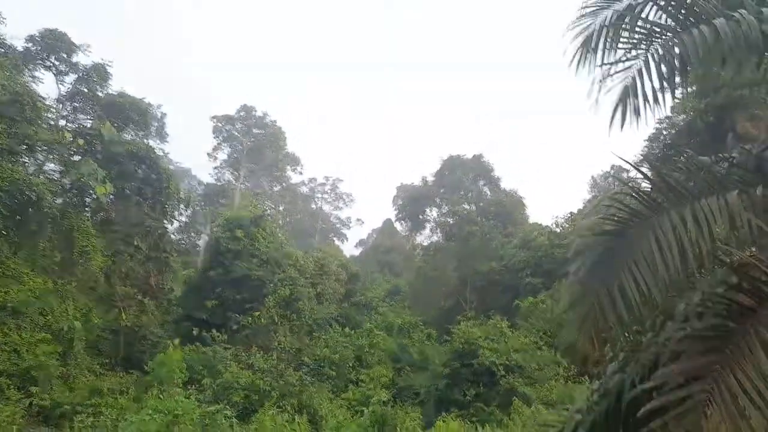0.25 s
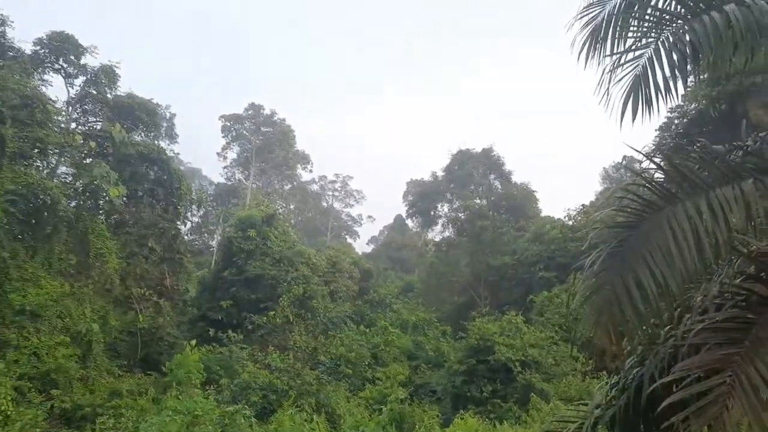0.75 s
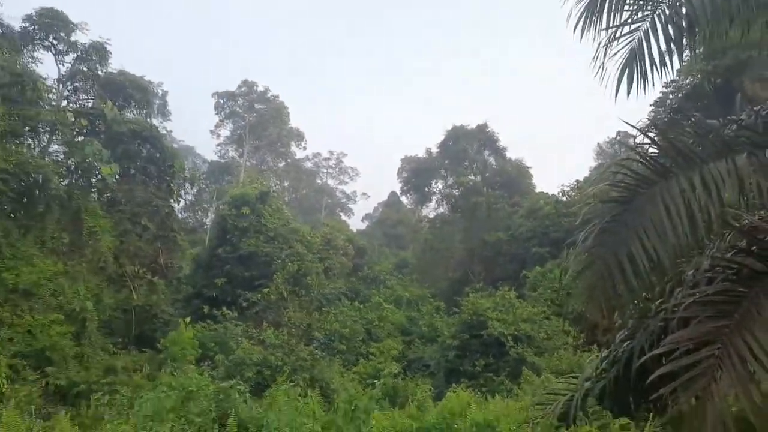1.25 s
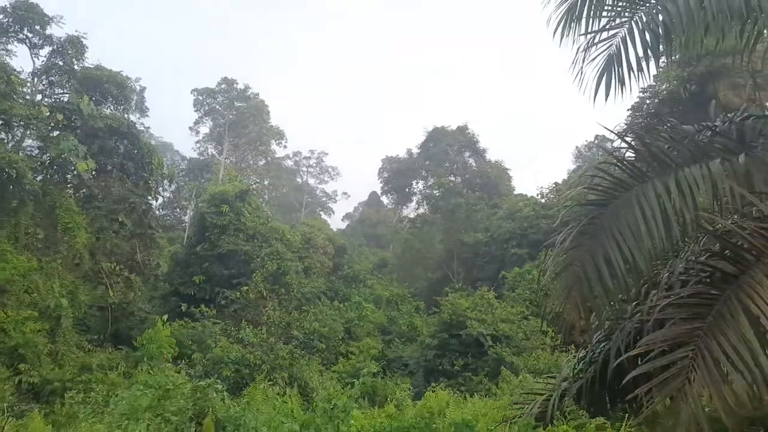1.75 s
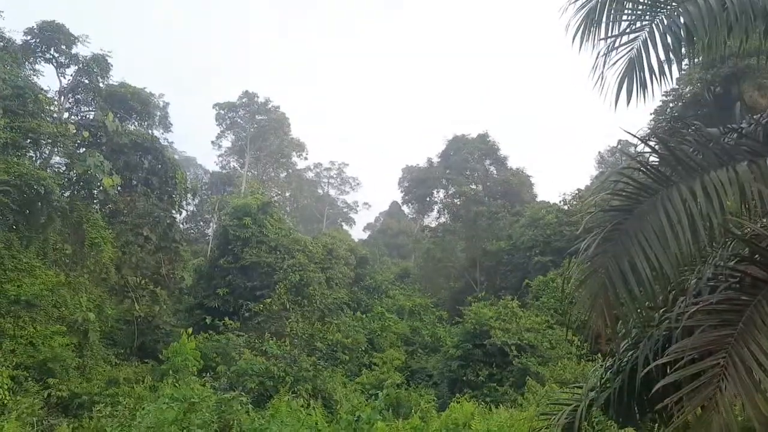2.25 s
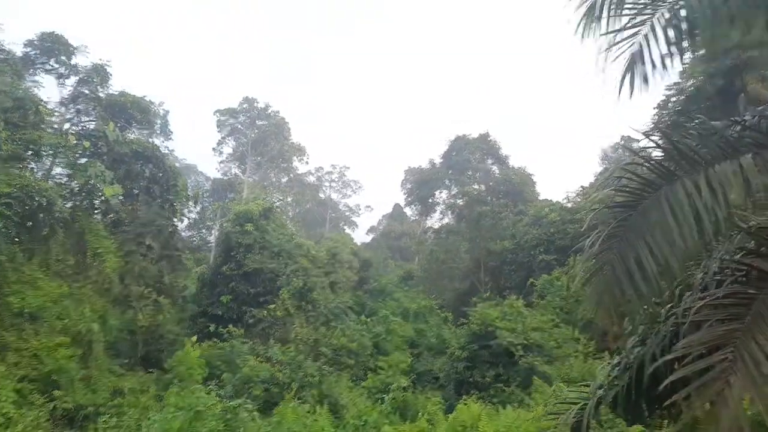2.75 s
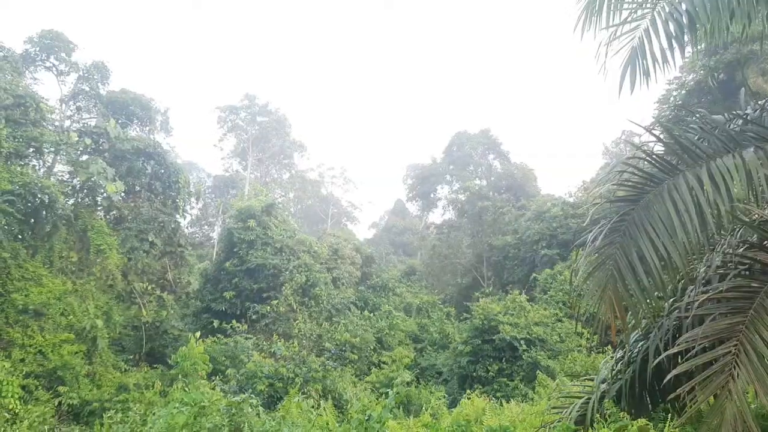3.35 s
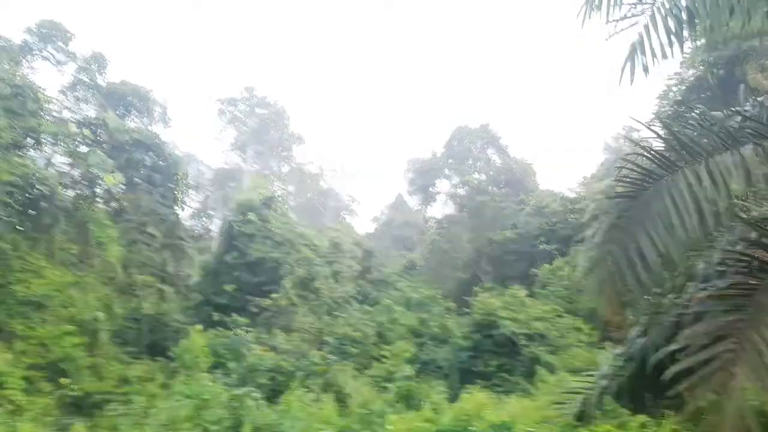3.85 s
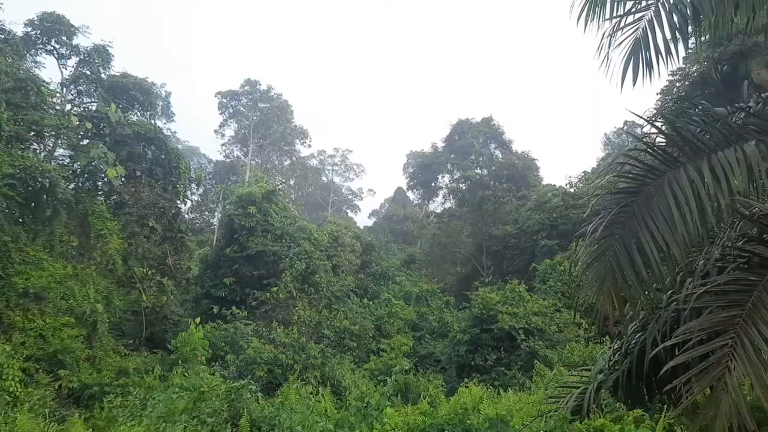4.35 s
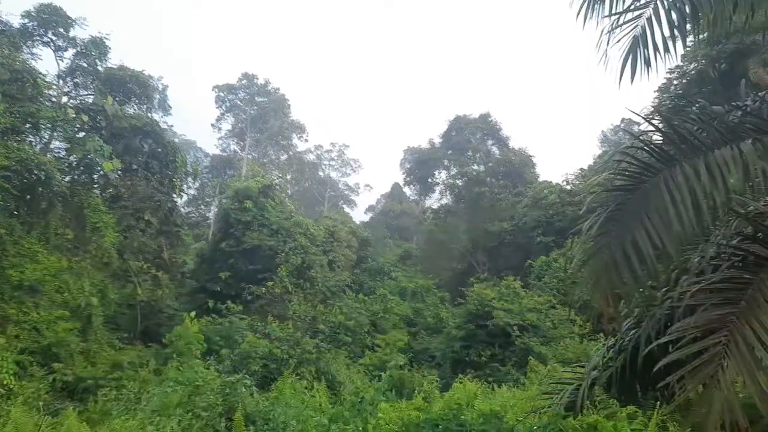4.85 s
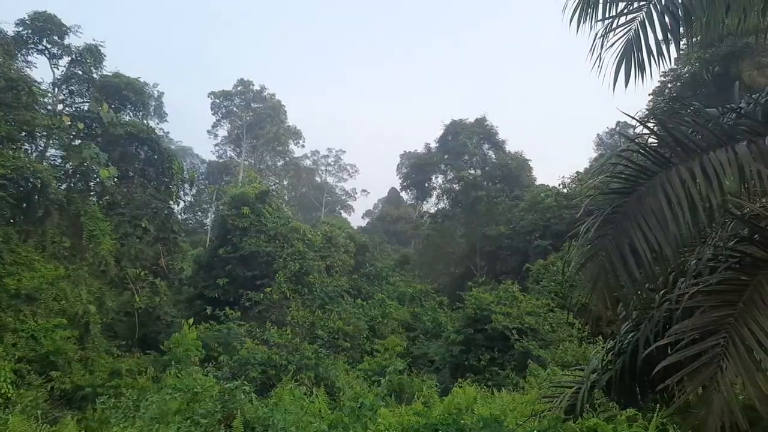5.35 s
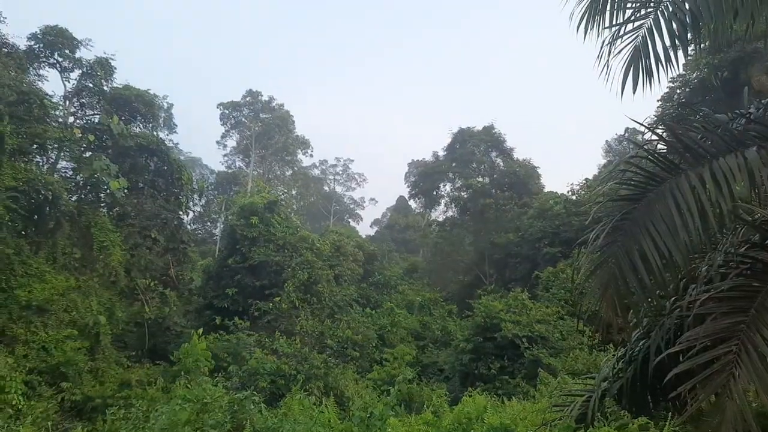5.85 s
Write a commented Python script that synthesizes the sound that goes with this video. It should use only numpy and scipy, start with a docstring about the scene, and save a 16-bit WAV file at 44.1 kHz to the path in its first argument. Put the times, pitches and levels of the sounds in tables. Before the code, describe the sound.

In an open rainforest clearing, a gibbon's high whistled note is already sounding, then a lower swelling hoot and two fainter, deeper ones follow, all echoing off trees and slopes. Cicadas hold a high throbbing buzz, a cricket whistles thinly and small birds chirp and twitter. A hand bumps the left side of the stereo microphone in the first 1.4 seconds; later, hollow wood knocks far away over a very faint engine hum.

```python
"""A rainforest clearing heard at two ports: cicadas (pulsed noise), a far engine (hum and rumble) and air. From
the start gibbons sing four long gliding whistles, echoing off near trees and far slopes; small birds chirp in
quick sweeps and a cricket whistles in phrases. In the first 1.4 s a hand bumps the left microphone in damped
rings and clicks. From 1.4 s far wood knocks in ringing bursts, and at 4.85 s and 5.43 s, as the high chirps
sound, brief filtered hiss flares far up in the treble."""
import sys
import numpy as np
from scipy import signal
from scipy.fft import rfft, irfft
from scipy.io import wavfile
from scipy.ndimage import uniform_filter1d

SR = 44100
rng = np.random.default_rng(int(sys.argv[2]) if len(sys.argv) > 2 else 0)


def attenuation_scalar(level_db):
    """Turn a level in dB into a linear amplitude multiplier (20 dB per decade)."""
    decades = np.asarray(level_db, float) / 20
    return 10 ** decades


def log_audio(samples):
    """Write samples as a 16-bit WAV file to the path given in sys.argv[1]."""
    # one column per channel
    frames = np.atleast_2d(samples).T
    # limit to full scale, then quantise
    limited = np.clip(frames, -1, 1)
    pcm = np.round(limited * 32767).astype(np.int16)
    wavfile.write(sys.argv[1], SR, pcm)


N = 269010  # length in samples

# In every table side_db is the level of the left port over the right, split evenly between them.


def evened(x):
    """Scales to an rms of one."""
    return x / np.sqrt(np.mean(x ** 2) + 1e-20)


def read(points, hz):
    """Reads a spectrum on a log-frequency axis."""
    f, value = np.transpose(points)
    return np.interp(np.log(hz + 1), np.log(f + 1), value)


def add(mix, s, sound, side_db):
    """Places a sound at s seconds, side_db louder at the left."""
    part = mix[:, round(s * SR):][:, :len(sound)]
    part += attenuation_scalar(np.array([[side_db / 2], [-side_db / 2]])) * sound[:part.shape[1]]


def wander(per_s):
    """Slow chance: straight lines between normal random values, per_s of them a second."""
    values = rng.standard_normal(int(N / SR * 200) + 9)
    return np.interp(np.arange(N) / SR * per_s, np.arange(len(values)), values)


def resonate(x, hz, width_hz):
    """Shifts hz down to zero, smooths three times at width_hz and shifts back: a steep resonance."""
    turn = np.exp(2j * np.pi * hz * np.arange(N) / SR)
    r = np.exp(-np.pi * width_hz / SR)
    smoothed = signal.sosfilt([[1 - r, 0, 0, 1, -r, 0]] * 3, x / turn)
    return 2 * (turn * smoothed).real


# how alike the hiss is at the two ports: frequency_hz, likeness (0-1)
PORT_LIKENESS = [(40, 1), (70, 0.68), (130, 1), (300, 0.48), (700, 0.31), (1500, 0.6), (3000, 0.012),
                 (15000, 0)]
# balance of the hiss between the ports: frequency_hz, side_db
HISS_SIDE = [(60, 0.5), (240, 1), (950, 3.5), (3770, 2.5), (15000, 2)]


def hiss(spectrum, patchy_db):
    """Random short-time spectra with blurred patches, partly shared by the two ports; overall rms one."""
    hz = np.fft.rfftfreq(2048, 1 / SR)[:, None]
    a, b, c, d, patches = rng.standard_normal((N // 512 + 5, 1025, 5)).T
    patches = uniform_filter1d(patches, size=24, axis=0)  # across frequency
    patches = evened(uniform_filter1d(patches, size=10, axis=1))  # along time
    same = np.clip(read(PORT_LIKENESS, hz), -1, 1)
    tilt = attenuation_scalar(read(HISS_SIDE, hz) / 2)
    left = a + 1j * b
    right = same * left + np.sqrt(1 - same ** 2) * (c + 1j * d)
    z = np.array([left * tilt, right / tilt])
    z *= attenuation_scalar(read(spectrum, hz) + patchy_db * patches)
    return evened(signal.istft(z, nperseg=2048, noverlap=1536)[1][:, :N])


def whistle(rows, fade_s, overtones=()):
    """A sine on a gliding pitch and level, with flickering overtones that grow or fade along the note."""
    s, hz, db = np.transpose(rows)
    t = np.arange(s[0], s[-1], 1 / SR)
    angle = 2 * np.pi * np.cumsum(np.interp(t, s, hz)) / SR
    tone = np.sin(angle)
    for multiple, *along_db in overtones:
        part_db = np.interp(t, np.linspace(s[0], s[-1], len(along_db)), along_db)
        flicker_db = 5 * wander(11.86)[:len(t)]
        tone = tone + attenuation_scalar(part_db + flicker_db) * np.sin(multiple * angle)
    fade = np.clip(np.minimum(t - s[0], s[-1] - t) / fade_s, 0, 1)
    return s[0], np.sqrt(2) * attenuation_scalar(np.interp(t, s, db)) * tone * fade


# spectrum of the far chorus and leaves, relative: frequency_hz, level_db (per hertz)
AIR_SPECTRUM = [(90, -35), (150, -24.5), (450, -24.5), (900, -35.5), (1400, -43), (2000, -42), (2750, -44),
                (3600, -36), (4100, -25), (4700, -18), (5600, -7.5), (6600, -11.5), (7200, -26),
                (8700, -20.5), (10500, -32), (15600, -41)]


def air():
    """Far chorus and leaves all round the clearing: shaped hiss with patches that come and go."""
    level_db = -48
    return attenuation_scalar(level_db) * hiss(AIR_SPECTRUM, patchy_db=3.5)


# the far engine along time: time_s, firing_hz, hum_db, rumble_db
ENGINE_COURSE = [(0.0, 68.7, -57, -39.5), (0.05, 68.2, -57.5, -58.5), (0.319, 70.7, -47, -43),
                 (0.461, 71.3, -57.5, -54), (1.46, 75.3, -43, -48.5), (2.071, 77.4, -54, -57.5),
                 (2.389, 79, -71, -66.5), (2.618, 78.68, -48.5, -57), (3.071, 78.1, -64.5, -49.5),
                 (3.35, 78.7, -65.5, -64), (4.5, 78.7, -55, -59), (4.642, 79, -47, -46.5),
                 (4.67, 75.9, -59, -48.5), (4.76, 79.9, -51.5, -57.5), (5.21, 79.4, -58.5, -60),
                 (5.37, 73.46, -70, -67), (5.57, 80.5, -73, -62), (6.1, 82.6, -53, -56)]
# spectrum of its rumble, relative: frequency_hz, level_db (per hertz)
RUMBLE_SPECTRUM = [(28, -61), (45, -1), (110, 0.5), (160, -13), (300, -19), (600, -52), (1200, -43)]


def engine():
    """Far off, a wavering sine at the firing rate, alike at both ports, over a lumpy low rumble."""
    s, *columns = np.transpose(ENGINE_COURSE)
    hz, hum_db, rumble_db = (np.interp(np.arange(N) / SR, s, c) for c in columns)
    hum = np.sqrt(2) * np.sin(2 * np.pi * np.cumsum(hz + 1.86 * wander(20)) / SR)
    rumble = hiss(RUMBLE_SPECTRUM, patchy_db=2.5)
    return attenuation_scalar(hum_db + 1.1 * wander(22)) * hum + attenuation_scalar(rumble_db) * rumble


# one row a body resonance: body_hz, width_hz (of each smoothing), level_db (before the swell), side_db,
# pulses_per_s, throbs_per_s, throb_phase (turns), throb_depth (0-1, before softening), swell_db (halfway)
CICADA_BODIES = [(5633, 760, -55.5, 7, 86, 6.08, 0.12, 0.5, 1),
                 (11650, 900, -71.5, 3, 86, 6.08, 0.2, 0.97, 2),
                 (10730, 1200, -73, 7, 86, 6.08, 0.12, 0.97, 1),
                 (6455, 250, -57, 3.5, 100, 6.1, 0.34, 0.15, 0),
                 (8460, 700, -64.5, 15.5, 116, 6.41, 0.7, 0.8, 3),
                 (9150, 700, -68, 17.5, 113, 6.63, 0.18, 0.8, -4),
                 (7800, 390, -71.5, 13, 120, 4.5, 0.39, 0.8, -1.5)]


def cicadas():
    """Noisy pulses ring each body resonance; the pulse trains swell and sink in steady throbs."""
    pulse_decay, gate_floor = 0.2, 0.2  # cycles to fall to 1/e; noise under a pulse of height one
    t, out = np.arange(N) / SR, np.zeros((2, N))
    arch = np.sin(np.pi * t / t[-1]) ** 2
    for hz, width, db, side_db, pulses, throbs, phase, depth, swell_db in CICADA_BODIES:
        beat = np.cumsum(pulses * (1 + 0.025 * wander(15))) / SR
        gate = gate_floor + np.exp(-(beat % 1) / pulse_decay)
        turns = throbs * t - phase + 0.031 * wander(1.3)
        throb = 1 + depth * np.tanh(np.cos(2 * np.pi * turns))
        ring = resonate(gate * throb * rng.standard_normal((2, N)), hz, width)
        level_db = db + swell_db * arch + 1.1 * wander(1.432)
        out += attenuation_scalar(level_db + np.array([[side_db / 2], [-side_db / 2]])) * evened(ring)
    return out


# phrases: start_s, length_s, level_db (before the swells below), start_hz
CRICKET_PHRASES = [(0.127, .56, -62, 3105), (0.883, 1.13, -59, 3112), (2.05, 1.29, -58, 3128),
                   (3.34, 1.28, -58, 3128), (4.61, 1.26, -58, 3128), (5.87, 1.2, -57, 3128)]
# a phrase swells three times: share_of_length, level_db (added to the phrase)
PHRASE_SWELLS = [(0, -14), (.06, -6), (.15, -8), (.2, -18), (.27, -1), (.45, -4), (.69, -8), (.74, -16),
                 (.81, -3), (.92, -2), (1, -13)]


def cricket():
    """A thin fluttering whistle, each phrase sagging in pitch and dipping twice in level."""
    end_hz = 3036
    out = np.zeros((2, N))
    for s, length, db, start_hz in CRICKET_PHRASES:
        rows = [(s + share * length, start_hz + share * (end_hz - start_hz), db + part_db)
                for share, part_db in PHRASE_SWELLS]
        add(out, *whistle(rows, 0.02), -2)
    return out * attenuation_scalar(4.24 * wander(30))


# distant knocks: start_s, level_db (rms before the decay), ring_hz
WOOD_KNOCKS = [(1.40, -53, 674), (1.535, -55, 1244), (1.782, -60, 1170), (2.746, -62.5, 1886),
               (3.20, -56.5, 1280), (4.258, -53, 845), (4.47, -49.5, 1360), (5.275, -54.5, 1272),
               (5.29, -55, 1300), (5.69, -52, 949), (5.776, -53, 1056), (5.989, -63.5, 1390)]


def knocks():
    """Far hollow wood: a gritty burst, coloured by a broad ring."""
    t, out = np.arange(3000) / SR, np.zeros((2, N))
    bursts = rng.standard_normal((len(WOOD_KNOCKS), 3000)) ** 3  # cubed: sparse and gritty
    for (s, db, hz), burst in zip(WOOD_KNOCKS, bursts):
        ring = signal.lfilter(*signal.iirpeak(hz, 3.5, SR), burst)
        band = signal.butter(2, [550, 2300], "band", fs=SR)
        body = signal.lfilter(*band, ring + 0.1 * burst)
        attack = 1 - np.exp(-t / 0.0026)
        add(out, s, attenuation_scalar(db - 60 * t / 0.14) * evened(body) * attack, 4)
    return out


# brief treble hiss: start_s, level_db (rms before rise and decay), centre_hz, width_hz
TREBLE_SPLASHES = [(4.85, -67, 13400, 1600), (5.434, -54.5, 12940, 7180)]


def splashes():
    """Treble hiss that rises fast and decays by 60 dB in 0.35 s."""
    t, out = np.arange(8000) / SR, np.zeros((2, N))
    bursts = rng.standard_normal((len(TREBLE_SPLASHES), 8000))
    for (s, db, hz, width), burst in zip(TREBLE_SPLASHES, bursts):
        band = signal.butter(2, [hz - width / 2, hz + width / 2], "band", fs=SR)
        sound = evened(signal.lfilter(*band, burst))
        add(out, s, attenuation_scalar(db - 60 * t / 0.35) * (1 - np.exp(-t / 0.015)) * sound, 1)
    return out


# spells in which a further flock twitters: start_s, end_s
TWITTER_SPELLS = [(.62, .9), (2.09, 2.33), (2.88, 3.1), (3.24, 3.6), (4.22, 4.58), (5.68, 5.86)]
TICK_S = 0.015  # length of a tick or twitter


def twitters():
    """Falling slides for a further flock, at chance moments, pitches, levels and sides in each spell."""
    notes_a_spell, loudest_db, low_hz, high_hz, drop = 9, -57, 3300, 4500, 0.15  # drop: share of the pitch
    slides = []
    for start, end in TWITTER_SPELLS:
        for when, pitch, loud, side in rng.random((notes_a_spell, 4)):
            hz = low_hz + pitch * (high_hz - low_hz)
            slides.append((start + when * (end - start), TICK_S, hz, hz * (1 - drop),
                           loudest_db - 6 * loud, 16 * side - 10))
    return slides


# In the bird tables level_db is at the top pitch (in WARBLE_NOTES along the note), before flutter and leaves.
# chirp shapes: share_of_length, share_of_top_pitch
SWOOP_CURVE = [(0, .94), (.15, 1), (.35, .97), (.6, .82), (1, .63)]
ARCH_CURVE = [(0, .88), (.35, .97), (.52, 1), (.65, .92), (1, .67)]
HOP_CURVE = [(0, .88), (.5, 1), (1, .88)]
HOOK_CURVE = [(0, 1), (.7, .98), (.82, .93), (1, .72)]
# chirps of each shape: start_s, length_s, top_hz, level_db, side_db
SWOOP_CHIRPS = [(0.855, 0.071, 4740, -51, 2.5), (1.755, 0.11, 4880, -49, 6.5), (4.46, 0.1, 4860, -52, 4),
                (5.972, 0.093, 5020, -49.5, 1)]
ARCH_CHIRPS = [(0.292, 0.073, 4950, -50, -2), (1.146, 0.075, 4950, -54.5, 0),
               (2.413, 0.088, 4950, -46, 0.5), (5.25, 0.097, 4900, -49.5, 3)]
HOP_CHIRPS = [(3.535, .018, 4120, -50, -9), (4.34, 0.021, 3930, -52, -8), (4.385, 0.038, 4200, -50, -1),
              (2.222, .02, 3760, -51.5, -7), (5.742, 0.03, 4010, -48.5, -5)]
HOOK_CHIRPS = [(1.93, 0.049, 4360, -48.5, -1.5), (4.2, 0.05, 4490, -57, 2), (4.292, 0.033, 4540, -54, 2)]
# quick ticks, nearly all falling: start_s, from_hz, to_hz, level_db, side_db
BIRD_TICKS = [(.675, 3900, 3100, -55, 0), (.72, 4000, 3400, -54, 0), (.76, 3900, 3300, -56, 0),
              (.812, 3000, 3300, -54, 0), (1.21, 4300, 3700, -55, 0), (1.785, 4500, 3700, -55, 0),
              (2.095, 4400, 3600, -53, -5), (2.935, 4900, 4300, -52, -5), (2.967, 5090, 4200, -49, -5),
              (3.0, 4950, 4300, -50, -5), (3.05, 4850, 4300, -53, 0), (3.249, 5000, 4300, -53, 0),
              (3.281, 4950, 4300, -50, -5), (3.314, 4950, 4300, -50, -1), (3.456, 4300, 3500, -51, -5),
              (3.487, 3900, 3000, -51, -2), (3.492, 4950, 4350, -51, 0), (3.524, 5050, 4350, -49, 0),
              (3.557, 5000, 4340, -49, -5), (3.765, 4900, 4300, -53, 0), (3.798, 4950, 4300, -50, 0),
              (3.831, 5050, 4260, -50, -2), (4.445, 4000, 3400, -50, -3), (4.463, 3550, 3050, -54, -3),
              (5.565, 4600, 3320, -53, 2), (5.69, 4290, 3240, -48, -11), (5.712, 4110, 3070, -48, -2)]
# straight slides: start_s, length_s, from_hz, to_hz, level_db, side_db
BIRD_SLIDES = [(.075, .055, 4750, 3100, -54, -9), (4.857, .065, 4700, 3050, -51, -8),
               (0.549, 0.065, 3940, 3770, -50, 4), (0.878, 0.04, 2770, 3930, -50, 0),
               (0.908, 0.02, 3750, 3480, -55, 0), (1.425, 0.062, 3920, 3834, -54, 2),
               (1.5, 0.095, 3850, 3810, -60.5, 2), (2.066, 0.024, 4310, 4100, -52, -10),
               (2.108, .01, 3350, 3796, -47, -7), (2.113, 0.026, 4800, 3080, -49, -12),
               (2.152, 0.025, 3580, 4100, -48, -12), (2.155, .018, 3540, 3090, -50, -4),
               (2.184, 0.0078, 3470, 3930, -46, -11), (2.24, 0.017, 3360, 2980, -52, -9),
               (2.32, 0.019, 3130, 3320, -54, 0), (2.404, 0.07, 3600, 3720, -55.5, -4),
               (3.411, 0.081, 2073, 2380, -62, 7), (3.43, .022, 3950, 4230, -50, -10),
               (3.476, 0.0091, 3340, 3800, -44, -9), (3.52, 0.016, 2985, 3340, -53.5, -12),
               (3.555, 0.016, 3570, 3080, -50, -10), (3.972, 0.104, 3960, 3770, -58, -12),
               (4.0, 0.048, 1910, 1640, -66, -1), (4.055, .045, 2250, 2330, -61, 12),
               (4.284, 0.015, 3060, 4400, -54, -3), (4.294, 0.063, 1990, 2038, -68, 9),
               (4.372, 0.0095, 2900, 3840, -46, -5), (4.53, .028, 3300, 4000, -49, -12),
               (4.56, .018, 3850, 3730, -56, -9), (4.65, 0.14, 5080, 4510, -55, 7),
               (4.84, 0.096, 6920, 6900, -59, -4), (5.585, 0.085, 4190, 3870, -49, 1),
               (5.765, 0.029, 3545, 3515, -57.5, -6), (5.31, 0.085, 4800, 4890, -57, 3),
               (3.363, .017, 4300, 3550, -46, -2)]
# one high chirp: time_s, pitch_hz
HIGH_CHIRP_GLIDE = [(5.37, 7400), (5.392, 7880), (5.412, 7820), (5.43, 7160), (5.448, 6700)]
# low warbles, one list a warble: time_s, pitch_hz, level_db
WARBLE_NOTES = [
    [(3.048, 2160, -65.5), (3.075, 2737, -60.5), (3.11, 2740, -70.5), (3.16, 2770, -69)],
    [(3.675, 1745, -73), (3.705, 2135, -70), (3.725, 1950, -76.5), (3.75, 2006, -64.5), (3.77, 1629, -72)],
]


def birds():
    """Short sine sweeps from perches all round, fluttering and (but for the warbles) fading toward low pitch."""
    fade_s, low_end_db_per_octave, high_chirp_db, flutter_db = 0.0035, 13, -40, 2.5
    chirps = []
    for curve, rows in [(SWOOP_CURVE, SWOOP_CHIRPS), (ARCH_CURVE, ARCH_CHIRPS),
                        (HOP_CURVE, HOP_CHIRPS), (HOOK_CURVE, HOOK_CHIRPS)]:
        for s, length, top_hz, db, side_db in rows:
            glide = [(s + share * length, part * top_hz) for share, part in curve]
            chirps.append((glide, db, side_db))
    slides = BIRD_SLIDES + [(s, TICK_S, *rest) for s, *rest in BIRD_TICKS] + twitters()
    for s, length, from_hz, to_hz, db, side_db in slides:
        chirps.append(([(s, from_hz), (s + length, to_hz)], db, side_db))
    chirps.append((HIGH_CHIRP_GLIDE, high_chirp_db, 1))
    out = np.zeros((2, N))
    for glide, db, side_db in chirps:
        top_hz = max(hz for s, hz in glide)
        rows = [(s, hz, db + low_end_db_per_octave * np.log2(hz / top_hz)) for s, hz in glide]
        add(out, *whistle(rows, fade_s), side_db)
    for rows in WARBLE_NOTES:
        add(out, *whistle(rows, fade_s), 5)
    return out * attenuation_scalar(flutter_db * wander(120))


# echo from the far slopes: frequency_hz, t60_s
SLOPE_T60 = [(300, 5.5), (1500, 3.14), (3000, 3.1), (9000, 0.17)]


def forest(x, near_t60, far_db):
    """Trunks and leaves scatter: sparse taps of random sign, a quick near part and a long far part."""
    taps = np.zeros((2, 2 * SR))
    # one tap at a chance place in every 20 samples
    at = np.arange(300, 2 * SR - 20, 20) + rng.integers(0, 20, (2, (2 * SR - 301) // 20))
    np.put_along_axis(taps, at, rng.choice([-1., 1.], at.shape), 1)
    hz, t, z = signal.stft(taps, SR, nperseg=256)
    near = attenuation_scalar(-60 * t / near_t60)
    far = attenuation_scalar(far_db - 60 * t / read(SLOPE_T60, hz)[:, None])
    tail = signal.istft(z * (near + far), SR, nperseg=256)[1]
    tail = tail / np.linalg.norm(tail[0])
    return signal.fftconvolve(x.mean(0)[None], tail, axes=1)[:, :N]


def linger():
    """A fading band of noise under the first note: the blurred echo of a lower start to it."""
    centre_hz, width_hz, start_db, t60_s = 1230, 490, -61, 4.2
    noise = resonate(rng.standard_normal((2, N)), centre_hz, width_hz)
    return attenuation_scalar(start_db - 60 * np.arange(N) / SR / t60_s) * evened(noise)


# delay of sound from the trees at the left port: frequency_hz, lag_samples
LEFT_PORT_LAG = [(1800, 4), (2600, 1.6)]


def delay_left_port(far):
    """Sound from the trees reaches the left port a few samples late, by a lag that varies with pitch."""
    hz = np.fft.rfftfreq(N, 1 / SR)
    turn = np.exp(-2j * np.pi * hz * read(LEFT_PORT_LAG, hz) / SR)
    return np.array([irfft(rfft(far[0]) * turn, N), far[1]])


# touches: start_s, level_db (reference at the left port), ring_hz, click_db (over level_db, before smoothing)
CASE_BUMPS = [(0.26, -38.5, 400, -5.5), (0.632, -40.5, 248, -33), (0.662, -41, 272, -32),
              (0.756, -41, 220, -3), (1.056, -46.5, 254, -13), (1.088, -38.5, 287, -30),
              (1.2276, -23, 257.5, 1), (1.2795, -15.5, 446, -10), (1.301, -10.5, 525, 3.5),
              (1.3133, -23.5, 306, -10)]
# modes of the microphone case: multiple_of_ring, level_db (over the bump's level_db)
CASE_MODES = [(1.0, 5), (1.53, -8), (0.57, -29), (2.3, -15)]


def bumps():
    """A finger meets the case by the left port: a short low ring and a sharp click."""
    t60_at_250_hz, t60_fall, side_db = 0.06, 2.34, 26  # higher rings die faster, by this power of the pitch
    t, out = np.arange(4000) / SR, np.zeros((2, N))
    snaps = rng.standard_normal((len(CASE_BUMPS), 4000))
    for (s, db, hz, click_db), snap in zip(CASE_BUMPS, snaps):
        t60 = t60_at_250_hz * (250 / hz) ** t60_fall
        thud = sum(attenuation_scalar(part_db - 60 * t / t60) * np.sin(2 * np.pi * hz * ratio * t)
                   for ratio, part_db in CASE_MODES)
        click = attenuation_scalar(click_db - 60 * t / 0.0023) * uniform_filter1d(snap, size=7, axis=0)
        attack = 1 - np.exp(-t / 0.00045)
        add(out, s, attenuation_scalar(db) * (thud * attack + click), side_db)
    return out * attenuation_scalar(-side_db / 2)  # so that level_db holds at the left port


# one list a note: time_s, pitch_hz, level_db
GIBBON_NOTES = [
    [(0.0, 1365, -33.5), (0.165, 1365, -34), (0.47, 1411, -39.5), (0.68, 1431, -46), (0.8, 1474, -41.5),
     (0.85, 1484, -39.5), (0.895, 1569, -45), (1.05, 1564, -46), (1.17, 1586, -41.5), (1.29, 1561, -42),
     (1.42, 1583, -36.5), (1.465, 1574, -42), (1.505, 1592, -37), (1.575, 1570, -39), (1.62, 1501, -47)],
    [(2.125, 847, -62.5), (2.15, 730, -42), (2.22, 668, -39), (2.34, 691, -33), (2.475, 746.5, -29.5),
     (2.595, 798.5, -35), (2.7, 803.6, -33), (2.915, 784, -35), (2.975, 775.4, -30), (3.285, 720.5, -30.5),
     (3.42, 703, -34.5), (3.535, 714, -33.5), (3.56, 761, -33.5), (3.59, 895, -62)],
    [(3.96, 567, -91.5), (4.03, 513.6, -54.5), (4.47, 540, -47.5), (4.585, 545.4, -49.5),
     (4.68, 551, -48.5), (4.79, 571.6, -51.5), (4.845, 669, -54.5)],
    [(5.16, 469, -76), (5.28, 461, -59.5), (5.4, 479, -51.5), (5.69, 494, -47.5), (5.775, 506, -48.5),
     (5.85, 467.5, -62)],
]
# one list a note: multiple_of_pitch, then level_db against the fundamental at even steps along the note
NOTE_OVERTONES = [
    [(2, -14, -13, -13, -13, -27, -18, -20, -20, -24), (3, -36, -34, -30, -24, -23, -15, -17, -20, -19)],
    [(0.72, -27, -36, -50, -46, -42, -42), (1.46, -58, -49, -56, -48, -52, -58),
     (2, -57, -46, -36, -41, -50, -53), (5, -62, -60, -55, -46, -39, -40, -52)],
    [(3, -25, -30, -32)],
    [],
]
# what each note sends to the echoes, as the singer turns toward or away from the slopes: level_db
NOTE_ECHOES = [-8, -18, -7.5, -29]


def gibbons():
    """Near-pure fluttering notes with weak overtones and side tones; gives direct sound and echo feed."""
    fade_s, flutter_db = 0.008, 1.3
    out, send = np.zeros((2, 2, N))
    for rows, overtones, echo_db in zip(GIBBON_NOTES, NOTE_OVERTONES, NOTE_ECHOES):
        s, note = whistle(rows, fade_s, overtones)
        note = note * attenuation_scalar(flutter_db * wander(28)[:len(note)])
        add(out, s, note, 1.5)
        add(send, s, attenuation_scalar(echo_db) * note, 0)
    return out, send


def scene():
    """Voices in the trees with their echoes, over insects, engine and air, and a hand at the microphone."""
    (apes, ape_send), chirps, wood = gibbons(), birds(), knocks()
    # leaves hide a part of each bird's straight path
    far = apes + attenuation_scalar(-3) * chirps + wood + cricket() + linger()
    # the nearest trees die fast; the slopes answer more softly
    far += forest(ape_send + attenuation_scalar(-9.5) * wood, near_t60=0.63, far_db=-16)
    far += forest(attenuation_scalar(-2.5) * chirps, near_t60=0.4, far_db=-20)
    return delay_left_port(far) + air() + engine() + cicadas() + splashes() + bumps()


def low_pass(x):
    """Removes everything above the highest recorded frequency."""
    return signal.sosfilt(signal.butter(12, 15780, fs=SR, output="sos"), x)


def record(dry):
    """The microphone loses the deepest bass, below 32.4 Hz."""
    bass_cut = signal.butter(3, 32.4, "high", fs=SR, output="sos")
    mix = signal.sosfilt(bass_cut, dry)
    return low_pass(mix)


dry = scene()
out = record(dry)
log_audio(out)
```